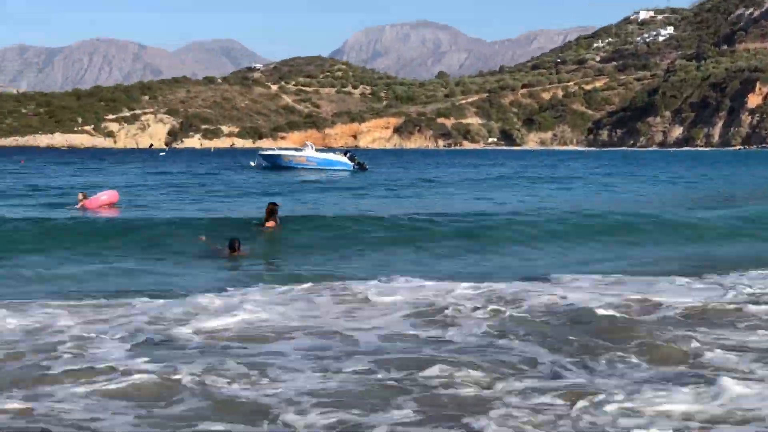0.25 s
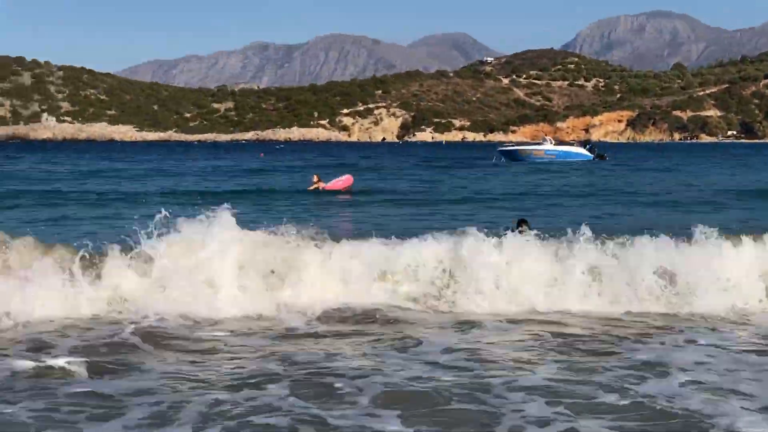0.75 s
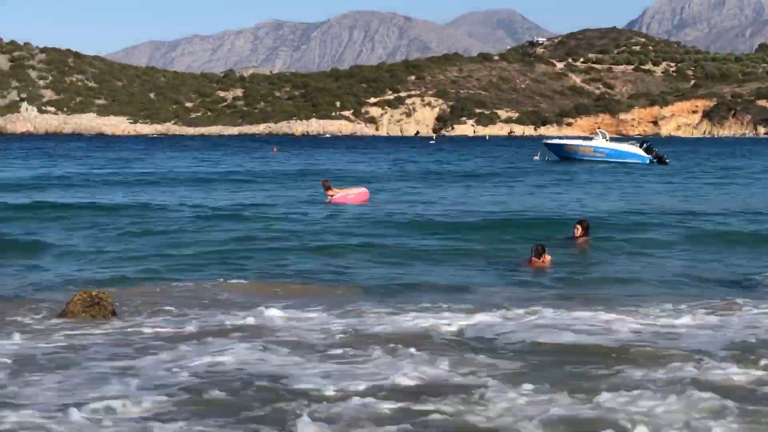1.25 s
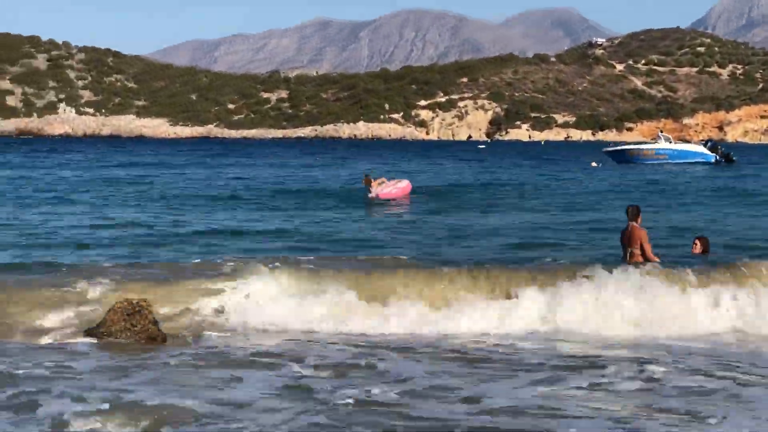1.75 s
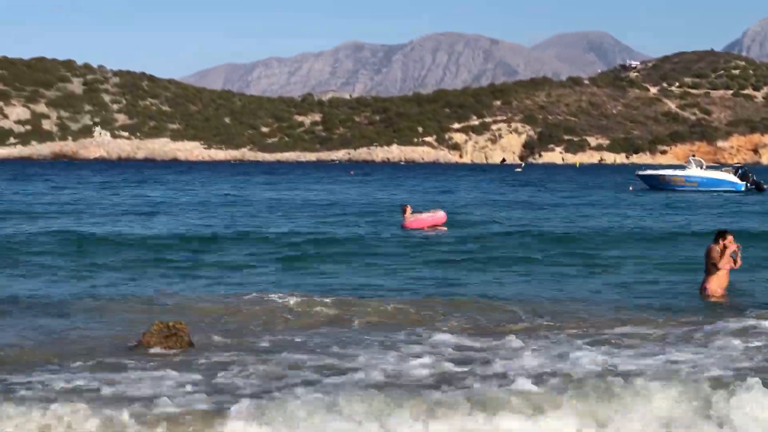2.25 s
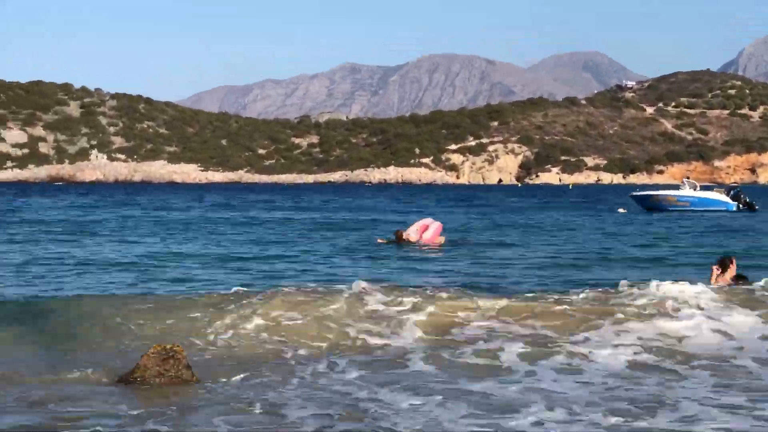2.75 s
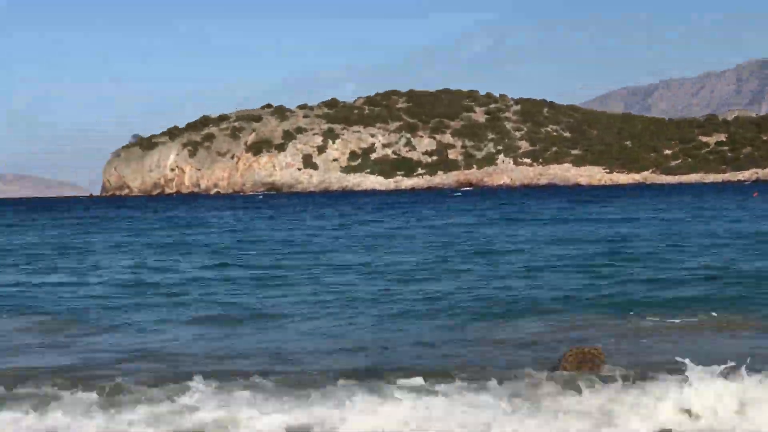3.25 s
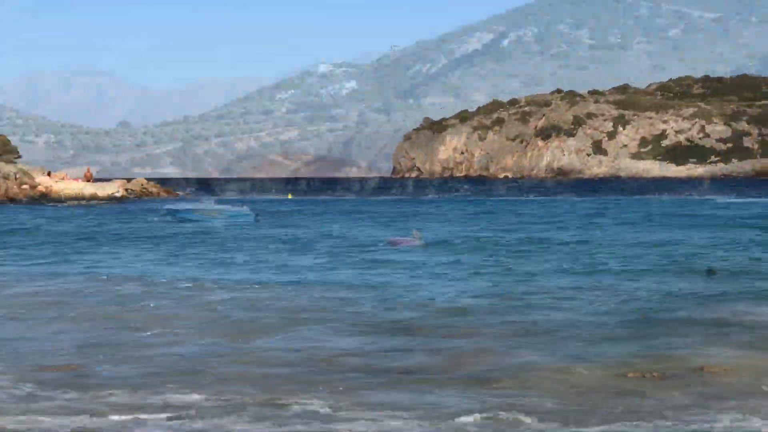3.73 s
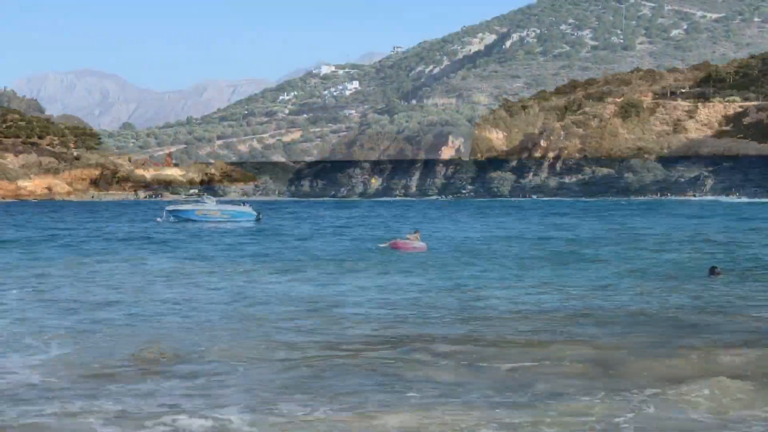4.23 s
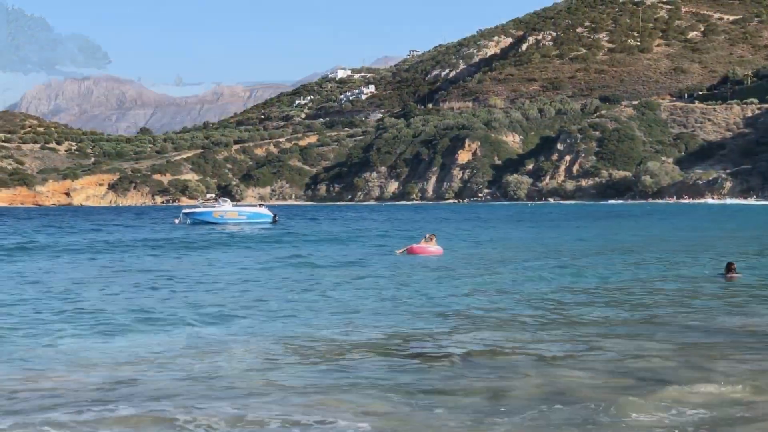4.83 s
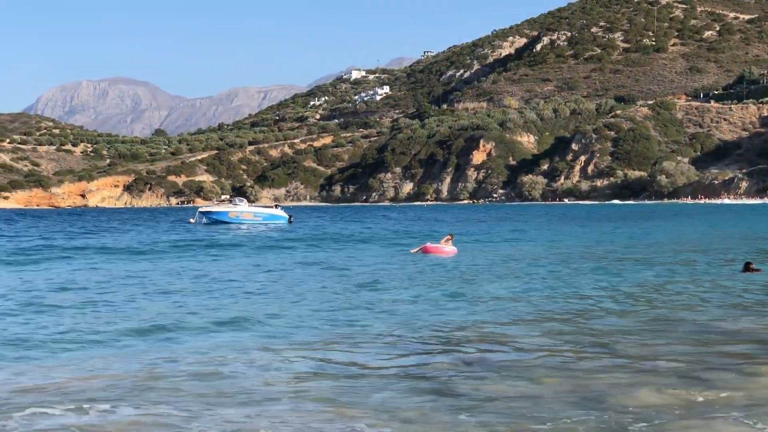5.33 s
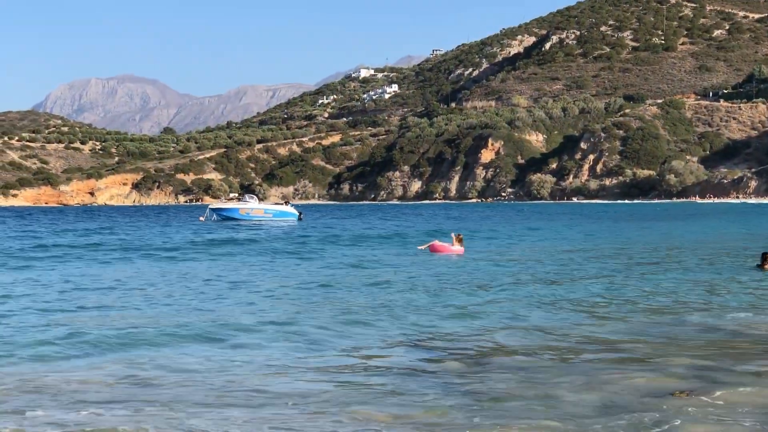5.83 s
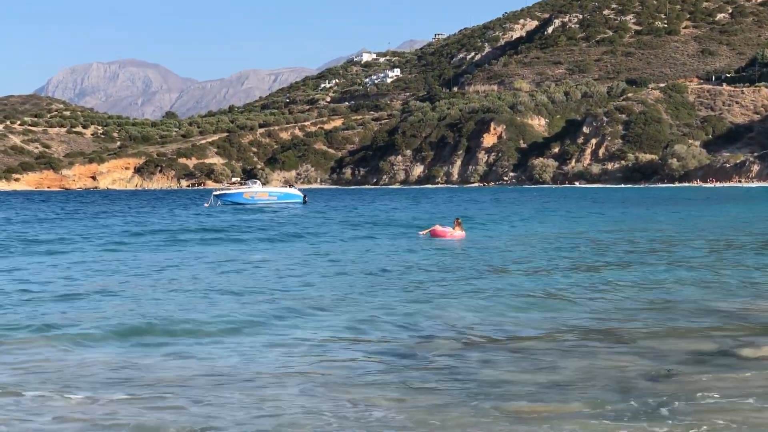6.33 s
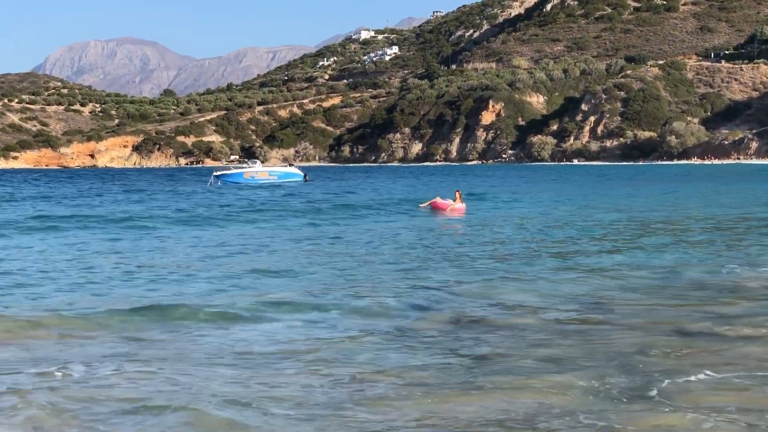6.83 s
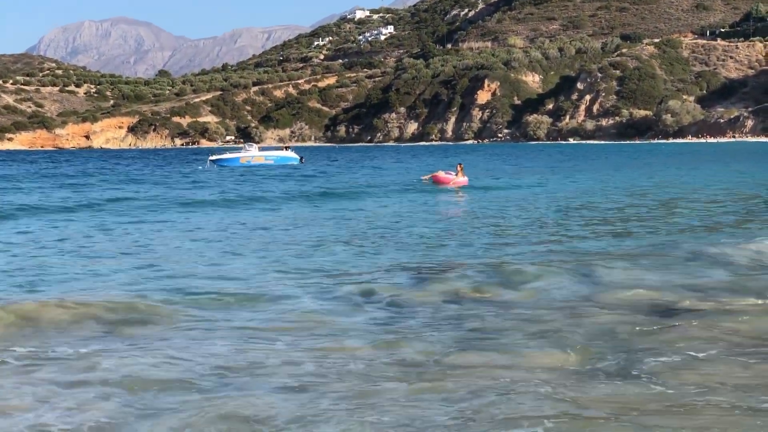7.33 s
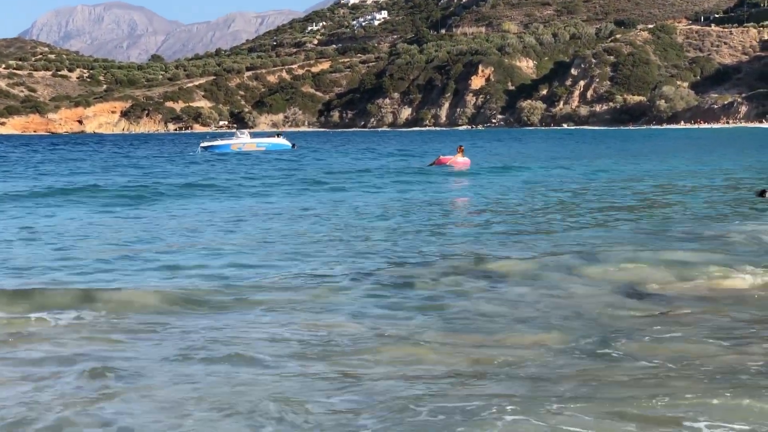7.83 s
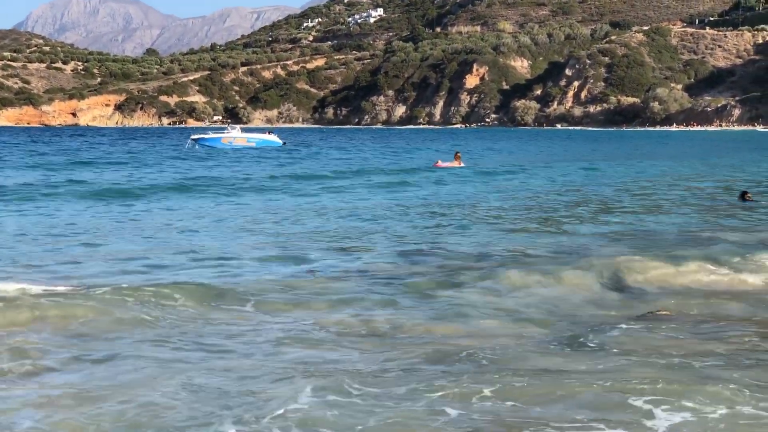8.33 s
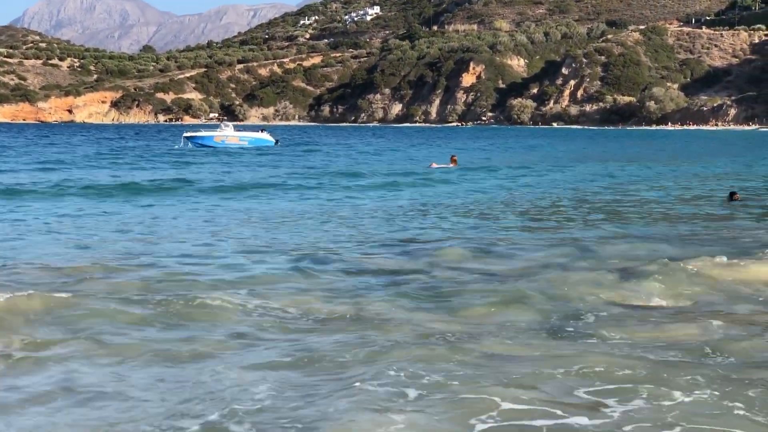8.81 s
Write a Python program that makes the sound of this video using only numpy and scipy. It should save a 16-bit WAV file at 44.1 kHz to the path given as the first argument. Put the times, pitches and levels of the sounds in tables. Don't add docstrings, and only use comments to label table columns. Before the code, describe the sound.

Fast, thin wave crashes and fizzing foam give way to a deeper natural-pace wash with gurgling bubbles and soft wind bumps.

```python
import sys
import numpy as np
from scipy import signal
from scipy.fft import rfft, irfft, next_fast_len
from scipy.io import wavfile

SR = 44100
rng = np.random.default_rng(int(sys.argv[2]) if len(sys.argv) > 2 else 0)


def store_wav(level_fs):
    pcm = np.round(np.clip(np.atleast_2d(level_fs), -1, 1) * 32767)
    wavfile.write(sys.argv[1], SR, pcm.T.astype(np.int16))


def decibels_to_gain(level_db):
    exponent = np.asarray(level_db, float) / 20
    return 10 ** exponent


N = 399982
STEP = 20

# time_s, force_db, water_depth_db
SURGE_FORCE = [(3.13, -35, 4), (3.8, -36.5, 2), (4.2, -35.5, -4.5), (5.0, -33, -1.5), (5.4, -32, -0.5),
               (5.9, -30, -1), (6.12, -29.5, 0.5), (6.45, -29, -1.5), (6.8, -28, -1.5), (7.15, -27, 2),
               (7.52, -28.5, 1.5), (7.62, -30.5, -0.5), (7.95, -35, 1), (8.14, -36.5, 1.5),
               (8.22, -38, -3.5), (8.4, -40.5, 0.5), (8.6, -40.5, 1), (9.07, -43.5, -2.5)]


def in_time(rows, step=1):
    time_s, *columns = np.transpose(rows)
    return [np.interp(np.arange(0, N, step) / SR, time_s, column) for column in columns]


def full_rate(slow):
    return np.interp(np.arange(N) / STEP, np.arange(len(slow)), slow)


def filtered(x, order, hz, kind):
    return signal.sosfilt(signal.butter(order, hz, kind, fs=SR, output="sos"), x)


def drift(rate_hz):
    settle = 3000
    r = np.exp(-2 * np.pi * rate_hz * STEP / SR)
    noise = rng.standard_normal((N + STEP - 1) // STEP + settle)
    slow = signal.lfilter([1], [1, -2 * r, r * r], noise)[settle:]
    return slow / slow.std()


def dissolve():
    fade_s = 3.13, 5.125
    start_s, end_s = fade_s
    t = np.arange(N) / SR
    progress = np.clip((t[::STEP] - start_s) / (end_s - start_s), 0, 1)
    return progress, t < end_s, t >= start_s


def bursting(share, spread_db):
    sizes = decibels_to_gain(spread_db * np.minimum(rng.exponential(1, N), 5)) * rng.standard_normal(N)
    share = np.clip(share, 0, 1)
    return np.sqrt(share) * sizes / sizes.std() + np.sqrt(1 - share) * rng.standard_normal(N)


def surf(levels_db, bands_hz, colour, slosh_db, patch_db, low_patch_db, share, spread_db):
    colour_hz, colour_db = np.transpose(colour)
    size = next_fast_len(N)
    hz = np.arange(size // 2 + 1) * SR / size + 1e-3
    shape = decibels_to_gain(np.interp(np.log(hz), np.log(colour_hz), colour_db)) * np.sqrt(SR / 2)
    water = [irfft(rfft(bursting(share, spread_db), size) * shape, size)[:N] for _ in range(2)]

    lifts = []
    for level_db, (low, high) in zip(levels_db, bands_hz):
        density = np.mean(shape[(hz > low) & (hz < high)] ** 2)
        lifts.append(level_db - 10 * np.log10(density * (high - low) * 2 / SR))
    centres = np.log(np.sqrt(np.prod(bands_hz, axis=1)))

    slosh = 0.25 * drift(6.0) + 0.45 * drift(40.0)
    edges = 22 * 2 ** (np.arange(30) / 3)
    out = np.zeros(N)
    for k, (low, high) in enumerate(zip(edges, edges[1:])):
        place = np.log(np.sqrt(low * high))
        at = np.interp(place, centres, np.arange(4))
        below = min(int(at), 2)
        lift = lifts[below] + (at - below) * (lifts[below + 1] - lifts[below])
        bright = np.interp(place, np.log([150., 1500., 9000.]), [0, .4, 1])
        own_patch_db = bright * patch_db + (1 - bright) * low_patch_db
        flicker = bright * slosh_db * slosh + own_patch_db * drift(11.7)
        out += full_rate(decibels_to_gain(lift + flicker)) * filtered(water[k % 2], 2, [low, high], "band")
    return out


def off_sand(x, echo, dull_hz):
    echo_ms, strength = in_time(echo)
    wander = full_rate(1 + .02 * drift(2.3))
    dull = signal.filtfilt(*signal.butter(1, min(dull_hz, 18000), fs=SR), x)
    late = np.interp(np.arange(N) - wander * echo_ms * SR / 1000, np.arange(N), dull)
    return x - np.clip(strength, 0, .9) * late


def far_foam():
    level_db = -52
    hiss = filtered(bursting(share=0.56, spread_db=2.0), 2, [4500, 10500], "band")
    return dissolve()[2] * decibels_to_gain(level_db) * hiss / hiss.std()


def wind_bumps():
    # start_s, peak_db, pitch_hz, cycles
    knocks = [(.132, -24, 594, 7.0), (.138, -33, 334, 4.5), (.205, -28.5, 1030, 20.0),
              (.253, -27, 420, 5.2), (4.205, -29, 65, 2.3), (4.314, -22, 234, 8), (4.32, -26, 69, 3.0),
              (4.445, -18, 125, 1.6), (4.815, -27, 700, 24.0), (4.908, -25, 540, 8.0),
              (5.05, -26, 680, 18.0), (5.135, -23, 200, 5.0), (5.42, -29, 75, 3.0), (5.62, -30, 105, 3.3),
              (5.785, -30, 50, 2.2), (7.525, -28, 60, 2.6), (8.43, -34, 63, 2.2), (8.559, -29, 180, 2.5),
              (8.644, -22, 234, 6.7), (8.652, -25.5, 112, 4), (8.672, -31, 75, 2.5), (7.51, -25, 400, 9.0),
              (8.79, -24, 250, 3.0), (8.845, -33, 63, 3.0), (8.915, -27, 180, 2.5)]
    out = np.zeros(N)
    for start_s, peak_db, pitch_hz, cycles in knocks:
        length = cycles / pitch_hz * SR
        u = np.arange(int(length)) / length
        swell = np.sin(np.pi * u ** .5) ** 2
        at = int(start_s * SR)
        out[at:at + len(u)] -= decibels_to_gain(peak_db) * swell * np.sin(2 * np.pi * cycles * (1.21 * u - 0.3 * u * u))
    return out


def chirps():
    # start_s, length_s, from_hz, to_hz, level_db (rms)
    calls = [
        (.486, .010, 3850, 5000, -32),
        (.492, .012, 9800, 12300, -43),
        (.497, .016, 5300, 7350, -31),
        (.503, .022, 14000, 15700, -40),
        (.505, .013, 2700, 3200, -40),
        (.513, .025, 7450, 8250, -38),
        (.541, .018, 14000, 10250, -32),
        (.564, .026, 6400, 7200, -45),
        (.564, .012, 12600, 13400, -35),
        (.598, .012, 11700, 13400, -35),
    ]
    glide_bend, overtone_db = 1.7, -14
    out = np.zeros(N)
    for start_s, length_s, from_hz, to_hz, level_db in calls:
        u = np.linspace(0, 1, int(length_s * SR))
        hz = to_hz + (from_hz - to_hz) * (1 - u) ** glide_bend
        turn = 2 * np.pi * np.cumsum(hz) / SR
        tone = np.sin(turn)
        if to_hz < 9000:
            tone += decibels_to_gain(overtone_db) * np.sin(2 * turn)
        swell = np.sin(np.pi * u ** 0.69) ** 1.3
        at = int(start_s * SR)
        out[at:at + len(u)] += np.sqrt(2) * decibels_to_gain(level_db) * swell * tone
    return out


def gurgle(level_db, per_s, cycles):
    force_db = in_time(SURGE_FORCE)[0]
    born = rng.random(N) < per_s / SR
    sizes = decibels_to_gain(3.4 * np.minimum(rng.exponential(1, N), 4)) * rng.choice([-1, 1], N) * born
    pitch_of = rng.integers(0, 12, N)
    out = np.zeros(N)
    for k, hz in enumerate(np.geomspace(540, 840, 12)):
        r = decibels_to_gain(-60 * hz / (cycles * SR))
        w = 2 * np.pi * hz / SR
        struck = sizes * (pitch_of == k) + 1e-18
        out += signal.lfilter([0, np.sin(w)], [1, -2 * r * np.cos(w), r * r], struck)
    soft = signal.lfilter([.1], [1, -.9], out)
    return dissolve()[2] * decibels_to_gain(force_db + level_db) * soft / soft.std()


def spray():
    # start_s, level_db (rms), length_s, centre_hz
    bursts = [(.69, -33, .025, 6500), (0.74, -31, 0.028, 6300), (0.76, -26.5, 0.039, 2740),
              (0.798, -32, 0.014, 2900), (.88, -39, .03, 3600), (1.757, -34.5, 0.05, 5800),
              (1.99, -33, .03, 4000), (3.03, -37, 0.07, 6800), (3.083, -32.5, 0.054, 2900),
              (3.153, -34, 0.044, 5700), (3.35, -35.5, 0.42, 2600), (7.533, -27.5, 0.042, 540),
              (3.805, -38, 0.2, 2440), (5.02, -40, 0.14, 3000), (0.692, -36, .025, 440),
              (0.754, -33, .03, 900), (.805, -29.5, 0.0226, 450), (1.765, -40, 0.027, 410),
              (1.88, -36.5, .04, 600), (4.898, -41, 0.13, 580), (5.2, -35, .04, 260),
              (1.62, -48, 0.093, 6200), (.8, -29, 0.033, 1130), (3.14, -38, 0.093, 7500),
              (8.0, -45, .25, 3900), (7.3, -37, 0.13, 1120), (0.56, -37, .02, 1200), (1.07, -36, .03, 1500),
              (5.65, -40, .03, 500)]
    out = np.zeros(N)
    drops = bursting(share=0.16, spread_db=-3.0)
    for start_s, level_db, length_s, centre_hz in bursts:
        size = int(2 * length_s * SR)
        at = int(start_s * SR) - size // 3
        burst = filtered(drops[at:at + size], 3, [centre_hz * 0.68, centre_hz * 1.15], "band")
        swell = np.sin(np.pi * np.linspace(0, 1, size) ** 0.58) ** 2
        out[at:at + size] += decibels_to_gain(level_db) * burst / burst.std() * swell
    return out


def breaker_parts():
    # time_s, cover_db, run_up_db (towards the microphone)
    foam = [(0.0, -31.5, 0), (.24, -31.5, 5.5), (.36, -32.5, 2), (.48, -34, -4.5), (.57, -42, -3),
            (.69, -29.5, -4), (1.4, -31.5, 2), (1.55, -31, 2), (1.7, -38.5, 1.5), (1.76, -32, -4.5),
            (2.33, -31, 0.5), (2.42, -34, 2), (2.93, -34.5, 0.5), (3.02, -32.5, -1.5), (3.5, -32.5, 0.5),
            (4.0, -36, 0.5), (4.3, -33.5, -2.5), (5.13, -34, -8)]
    # start_s, force_db, tumbling_s, hollowness_db
    crashes = [
        (.03, -35.5, 0.17, -2.5),
        (.68, -28.5, 0.058, 2),
        (1.76, -33.5, .14, -1),
        (3.02, -32, 0.14, -1),
        (4.2, -39.5, 0.36, 2),
        (4.9, -37.5, .2, 4),
    ]
    # level_db, share_of_cover [dB per dB], share_of_run_up [dB per dB]
    sheet_parts = [
        (-50.5, 0.7, .05),
        (-41, 0.55, .05),
        (-33.5, 0.86, .05),
        (-40, 0.33, 0.92),
    ]
    # level_db, share_of_hollowness [dB per dB], dying_db_per_s
    crash_parts = [
        (-5.5, 1.0, 32),
        (0, -0.33, 18.5),
        (-2, -.2, 39),
        (-8.5, 0.046, 40),
    ]
    rear_up_db_per_s = 210
    t = np.arange(0, N, STEP) / SR
    cover_db, run_up_db = in_time(foam, STEP)
    levels_db = []
    for sheet, crash in zip(sheet_parts, crash_parts):
        sheet_db, of_cover, of_run_up = sheet
        crash_db, of_hollow, dying_db_per_s = crash
        power = decibels_to_gain(2 * (sheet_db + of_cover * (cover_db + 32.5) + of_run_up * run_up_db))
        for start_s, force_db, tumbling_s, hollow_db in crashes:
            before_db = rear_up_db_per_s * np.maximum(start_s - t, 0)
            after_db = dying_db_per_s * np.maximum(t - start_s - tumbling_s, 0)
            power += decibels_to_gain(2 * (force_db + crash_db + of_hollow * hollow_db - before_db - after_db))
        levels_db.append(10 * np.log10(power))
    return levels_db


def quick_breakers():
    # pitch_hz, density_db (per Hz)
    colour = [(35, -80), (60, -50), (96, -33.5), (328, -4.5), (740, -3), (1260, -3), (2010, -5),
              (3600, -6.5), (4650, -8.5), (5870, -9), (15600, -14.5)]
    # low_hz, high_hz
    bands_hz = [(250, 600), (700, 1800), (2500, 5000), (9000, 15500)]
    # time_s, delay_ms, strength (0-1)
    echo = [(0, 0.44, 0.34), (.55, 0.3, 0.03), (.7, 0.455, 0.35), (1.1, 0.488, 0.33), (1.6, 0.38, .27),
            (2.3, 0.45, 0.31), (2.9, 0.41, 0.28), (3.05, 0.49, 0.22), (3.9, 0.58, 0.2), (5.13, 0.64, .1)]
    progress, inside, _ = dissolve()
    fades_db = [2.0, 2.5, -2.5, 0.5]
    levels_db = [level + fade_db * progress for level, fade_db in zip(breaker_parts(), fades_db)]
    x = surf(levels_db, bands_hz, colour, slosh_db=1.5, patch_db=0.63, low_patch_db=0.7,
             share=0.29, spread_db=4.0)
    x = filtered(x, 2, 185, "high")
    trace = filtered(rng.standard_normal(N), 2, 90, "low")
    x = x + np.repeat(decibels_to_gain(levels_db[0] - 30 + 4.9 * drift(15.0)), STEP)[:N] * trace
    return inside * off_sand(x, echo, dull_hz=6400)


def surge_parts():
    # level_db (middle force), share_of_force [dB per dB], share_of_depth [dB per dB]
    parts = [
        (-41, 0.28, -0.076),
        (-35, 0.79, 1.0),
        (-33, 1.01, -0.019),
        (-39, 1.19, 0.21),
    ]
    # time_s, level_db
    wind = [(3.13, 0.5), (3.6, 1.5), (4.2, 3), (4.7, -0.5), (5.3, 1), (6.1, -3.5), (6.55, -2), (6.85, 4),
            (7.3, 2), (7.8, -2), (8.2, -5), (8.5, 0), (9.07, 5)]
    gust_db, gusts_per_s = 1.5, 9
    force_db, depth_db = in_time(SURGE_FORCE, STEP)
    levels_db = []
    for middle_db, of_force, of_depth in parts:
        levels_db.append(middle_db + of_force * (force_db + 33) + of_depth * depth_db)
    levels_db[0] += in_time(wind, STEP)[0] + gust_db * drift(gusts_per_s)
    return levels_db


def long_surge():
    # pitch_hz, density_db (per Hz)
    colour = [(15, -49), (25, -25), (59, -16), (240, -4), (471, -2), (806, -4), (898, -4.5), (1140, -4),
              (1960, -9.5), (3020, -11.5), (6240, -18), (9100, -24.5), (15600, -41.5)]
    # low_hz, high_hz
    bands_hz = [(40, 150), (200, 500), (600, 2000), (4000, 9000)]
    # time_s, delay_ms, strength (0-1)
    echo = [(3.13, 2.38, 0.33), (4.3, 2.13, 0.53), (6.3, 2.28, 0.33), (6.7, 1.62, 0.37), (7.2, 1.8, 0.26),
            (9.07, 1.7, .08)]
    progress, _, inside = dissolve()
    lacks_db = [2.0, -1.0, -6.0, -9.5]
    levels_db = [level + lack_db * (1 - progress) for level, lack_db in zip(surge_parts(), lacks_db)]
    x = surf(levels_db, bands_hz, colour, slosh_db=2.0, patch_db=0.68, low_patch_db=0.45,
             share=0.13, spread_db=4.5)
    x = filtered(inside * x, 3, 40, "high")
    return off_sand(x, echo, dull_hz=1080)


def scene():
    bumps = filtered(wind_bumps(), 2, 45, "high")
    bubbles = gurgle(level_db=-10.5, per_s=110.0, cycles=23.0)
    water = quick_breakers() + long_surge() + bubbles + spray() + far_foam()
    mono = water + bumps + chirps()
    return np.array([mono, mono])


def flecks(mono, apart_db):
    centres_s = [.023, .163, .325, .837, 1.092, 1.186, 1.881, 2.162, 2.463, 2.591, 2.615, 2.695, 2.766,
                 2.882, 3.274, 3.367, 3.391, 3.46, 3.902, 3.973, 4.157, 4.739, 4.832, 5.155, 6.34, 7.362,
                 7.408, 8.082, 8.639, 8.731]
    lowest_hz, highest_hz, width_hz = 4740, 14500, 2150
    size = 1600
    window = signal.windows.hann(size) ** 0.4
    hz = np.arange(size // 2 + 1) * SR / size
    mid, side = mono.copy(), np.zeros(N)
    for centre_s, place in zip(centres_s, rng.random(len(centres_s))):
        low = lowest_hz * (highest_hz / lowest_hz) ** place
        at = max(int(centre_s * SR) - size // 2, 0)
        band = irfft(rfft(mono[at:at + size] * window) * ((hz > low) & (hz < low + width_hz)))
        mid[at:at + size] -= (1 - decibels_to_gain(apart_db)) * band
        side[at:at + size] += decibels_to_gain(apart_db) * band[::-1]
    return np.array([mid + side, mid - side])


def band_limit(x):
    return signal.sosfilt(signal.butter(12, 15740, fs=SR, output="sos"), x)


def record(dry):
    mix = flecks(dry[0], apart_db=-1.5)
    return band_limit(mix)


dry = scene()
out = record(dry)
store_wav(out)
```